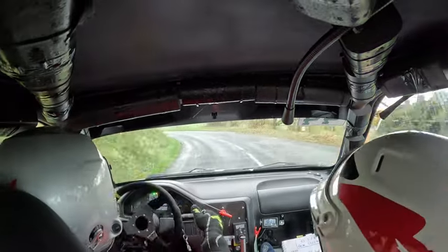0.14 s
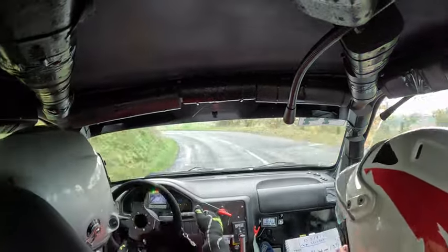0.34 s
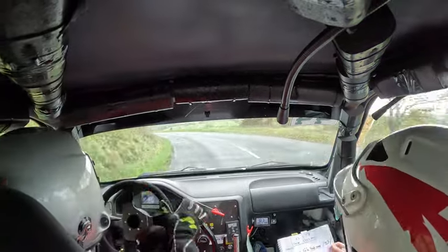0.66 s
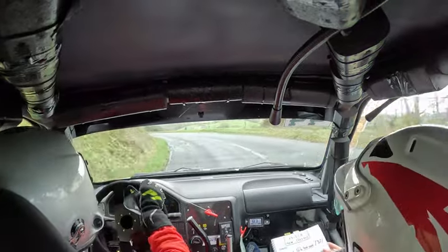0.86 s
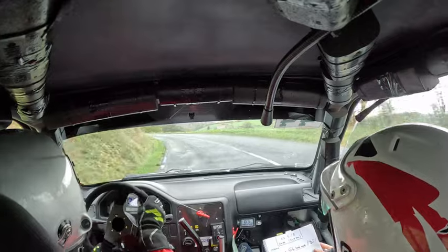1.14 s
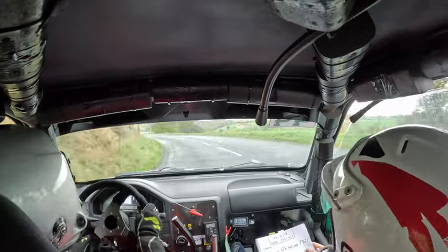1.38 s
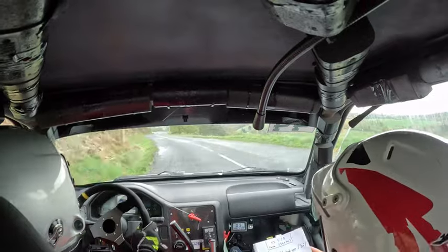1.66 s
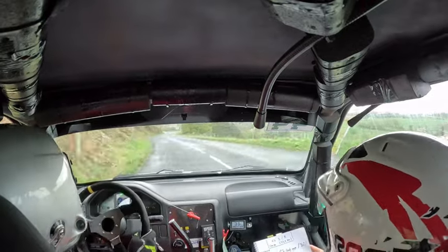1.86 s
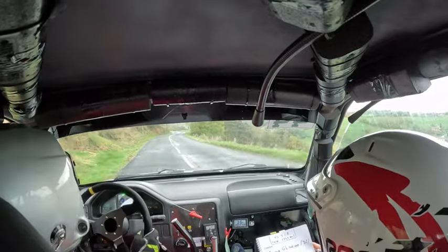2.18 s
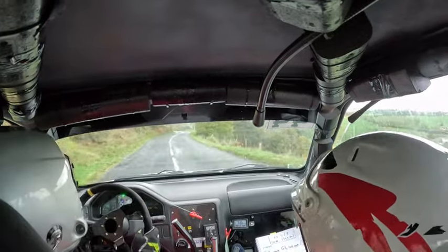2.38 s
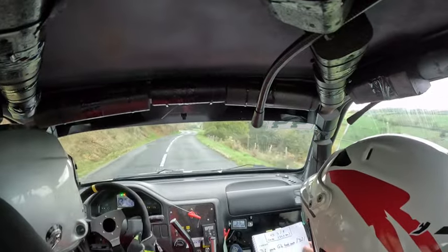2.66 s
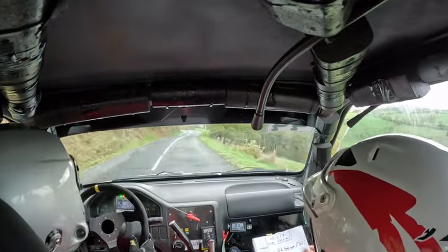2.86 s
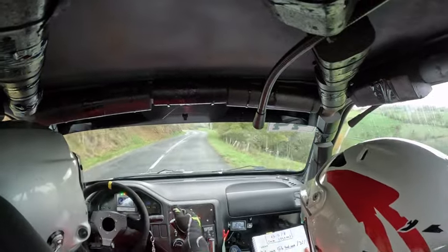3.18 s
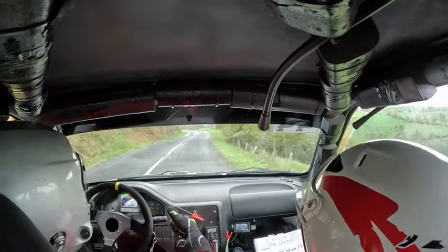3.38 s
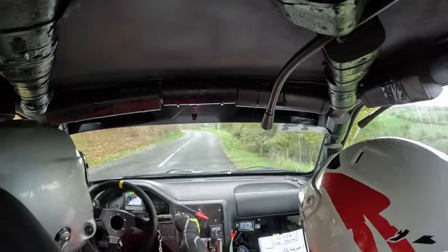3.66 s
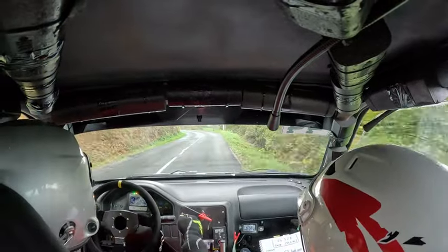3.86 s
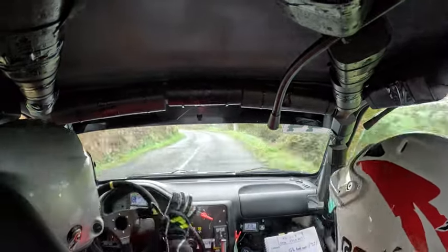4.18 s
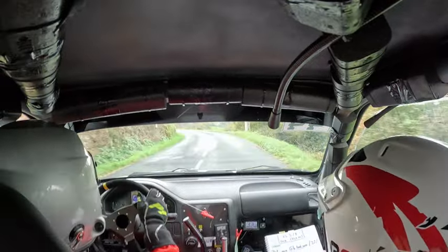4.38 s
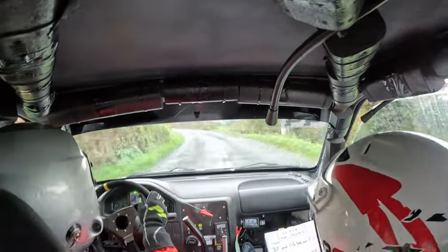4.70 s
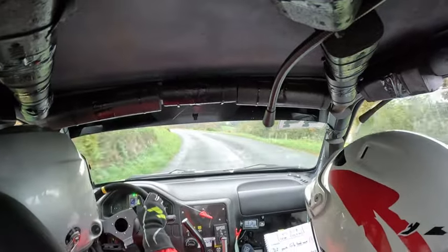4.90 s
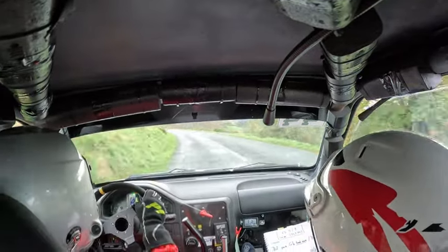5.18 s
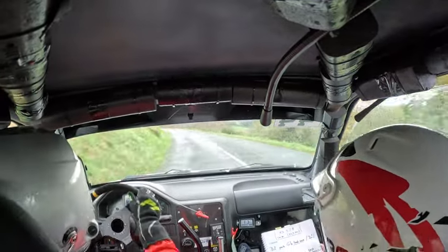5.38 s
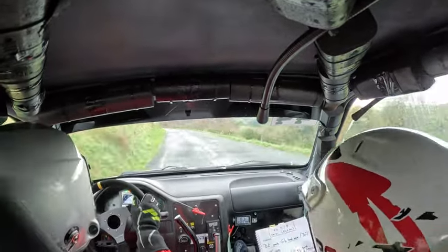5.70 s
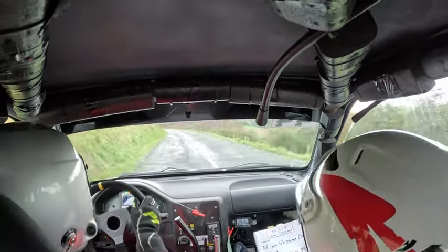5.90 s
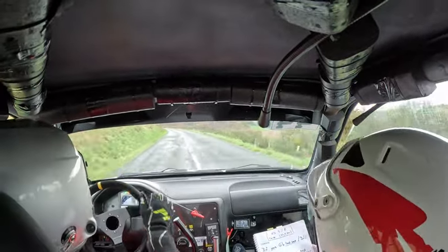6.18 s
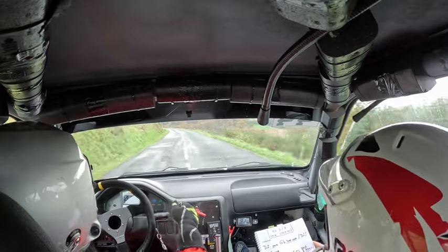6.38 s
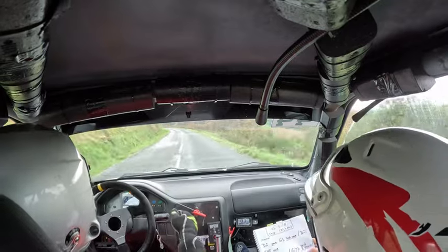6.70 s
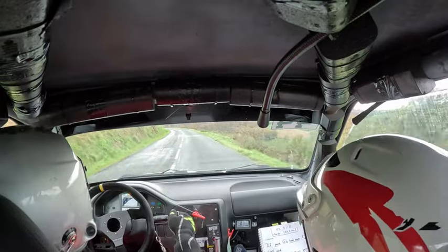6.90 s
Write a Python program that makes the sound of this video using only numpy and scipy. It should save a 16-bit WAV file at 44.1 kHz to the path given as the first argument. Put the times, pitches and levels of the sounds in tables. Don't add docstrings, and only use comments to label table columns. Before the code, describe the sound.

Heard from between the seats of a stripped rally car, a small four-cylinder engine pulls at full throttle. Its loud, buzzing drone rises briefly, dips ragged in a fast gear change, climbs for about three seconds, dips again and climbs to the end. Rough tarmac shakes the metal shell, thuds come through the floor, and grit ticks underneath. Valve clatter and wind hiss stay on top; peaks are squashed level.

```python
import sys
import numpy as np
from scipy import signal
from scipy.fft import rfft, irfft, next_fast_len
from scipy.io import wavfile
from scipy.ndimage import uniform_filter1d

SR = 44100
rng = np.random.default_rng(int(sys.argv[2]) if len(sys.argv) > 2 else 0)


def magnitude_from_level(level_db):
    exponent = np.asarray(level_db, float) / 20
    return 10 ** exponent


def output_pcm(signal):
    pcm = np.clip(np.atleast_2d(signal).T, -1, 1) * 32767
    wavfile.write(sys.argv[1], SR, np.round(pcm).astype(np.int16))


N = 310905
STEP = 40


def rms_one(x):
    return x / np.sqrt(np.mean(x ** 2) + 1e-20)


def smooth(coarse):
    return np.interp(np.arange(N) / STEP, np.arange(len(coarse)), coarse)


def chance(rate):
    r = np.exp(-2 * np.pi * rate * STEP / SR)
    noise = rng.standard_normal(N // STEP + 501)
    return rms_one(signal.lfilter([1], [1, -2 * r, r * r], noise)[500:])


def drift(rate):
    return smooth(chance(rate))


def in_time(rows):
    s, *columns = np.transpose(rows)
    return [np.interp(np.arange(N) / SR, s, column) for column in columns]


def tents(s, db, half):
    t = np.arange(0, N + STEP, STEP) / SR
    closeness = np.clip(1 - np.abs(t - s[:, None]) / np.abs(half)[:, None], 0, 1)
    return smooth(np.sum(db[:, None] * closeness, axis=0))


def colour(x, spectrum):
    hz, db = np.transpose(spectrum)
    size = next_fast_len(N)
    bins = np.fft.rfftfreq(size, 1 / SR)[1:]
    gain = magnitude_from_level(np.interp(np.log(bins), np.log(hz), db, left=-90, right=-90))
    return irfft(rfft(x, size) * np.r_[0, gain], size)[:N]


def resonate(x, hz, width):
    r = np.exp(-np.pi * width / SR)
    peak = (1 - r * r) / 2
    return signal.lfilter([peak, 0, -peak], [1, -2 * r * np.cos(2 * np.pi * hz / SR), r * r], x)


def even(x, floor):
    x = rms_one(x)
    return rms_one(x / np.sqrt(uniform_filter1d(x ** 2, size=2400) + floor))


# time in seconds, firing rate in Hz.
FIRST_PULL = [
    (0, 234.8),
    (.3, 243.8),
    (.5, 252.4),
    (.61, 255.6),
    (.66, 252),
]
FIRST_CHANGE = [
    (.7, 230),
    (.73, 225.5),
    (.77, 223),
    (.8, 207),
]
SECOND_PULL = [
    (.9, 213),
    (1.04, 212),
    (1.28, 215.6),
    (1.52, 224.6),
    (1.76, 221.7),
    (2.42, 226),
    (3.0, 239.6),
    (3.5, 251.3),
    (3.88, 260),
]
SECOND_CHANGE = [
    (4.0, 256),
    (4.085, 250),
    (4.15, 222),
]
THIRD_PULL = [
    (4.38, 220.6),
    (4.76, 226.8),
    (5.3, 234),
    (5.42, 236.6),
    (5.54, 240.4),
    (5.75, 240.4),
    (6.4, 249),
    (6.84, 254.3),
    (7.05, 258.5),
]


def engine_speed():
    return in_time(FIRST_PULL + FIRST_CHANGE + SECOND_PULL + SECOND_CHANGE + THIRD_PULL)[0]


# time in seconds, fine roughness in dB, long waves in dB, wind in dB.
ROAD = [(0, -1, -0.5, -1), (.3, -2, -3, -1), (.6, 2, -2, -1), (.8, 3, 1.5, 2.5), (1.25, 1, 6.5, 2),
        (1.7, 5, 5, 0), (2.2, -1, -7, -1), (2.67, -8.5, -8.5, -1.5), (3.3, 0.5, -5.5, -2.5),
        (3.7, 0.5, 0, 0.5), (4.2, 7, 7, 1.5), (4.4, -4.5, -2.5, -1.5), (5.1, -7, -3.5, -2),
        (5.6, 1.5, 2.5, 1), (6.0, 2.5, 3, .5), (6.4, 4.5, 4, -0.5), (6.7, 0.5, 4, 1), (7.05, 5, 1.5, 1.5)]
# centre in seconds, thud in dB, rattle in dB, half length in seconds.
JOLTS = [(0.315, -8, -3.5, 0.065), (0.58, -12, 2, 0.036), (0.692, 7, 3.5, .03), (0.924, 0.5, 3, 0.044),
         (1.176, 3, 1.5, .06), (1.307, -12, 6, 0.031), (1.347, 7, 2.5, 0.051), (2.288, -2, 2, 0.063),
         (2.385, -15, -1, 0.09), (2.916, -1, 4.5, 0.062), (3.047, -2, 5.5, 0.057), (3.646, -6.5, 1.5, .05),
         (3.782, 1, 2.5, 0.073), (3.867, 3, 4.5, 0.024), (4.047, 7, 0, 0.04), (4.187, 1, 4.5, 0.046),
         (4.36, -7, 1.5, 0.062), (5.633, -3, 4, 0.04), (5.873, -7, 0.5, 0.067), (6.314, 4.5, 0.5, 0.078),
         (6.73, -1, 1, 0.045), (6.79, -7, 5, .04), (6.973, 1.5, 8, 0.075)]
SHAKE_DB, RUMBLE_DB, HISS_DB, LESSER_DB = -22.5, -30.5, -30.5, -28.5
HISS_RATTLES, LESSER_RATTLES = 0.57, 0.66
LESSER_FOLLOWS = 0.37
HISS_DB_PER_HZ, LESSER_DB_PER_HZ, MIDDLE_HZ = 0.0758, -0.0035, 243


def road_levels(firing_hz):
    rough, waves, wind = in_time(ROAD)
    s, thud_db, rattle_db, half = np.transpose(JOLTS)
    rattle = tents(s, rattle_db, half)
    faster = firing_hz - MIDDLE_HZ
    hiss_db = HISS_DB + wind + HISS_RATTLES * rattle + HISS_DB_PER_HZ * faster
    rumble_db = RUMBLE_DB + waves + tents(s, thud_db, half) + 1.5 * drift(3)
    shake_db = SHAKE_DB + rough + rattle + 0.77 * drift(1.3)
    lesser_db = LESSER_DB + LESSER_FOLLOWS * wind + LESSER_RATTLES * rattle
    lesser_db = lesser_db + LESSER_DB_PER_HZ * faster + 0.58 * drift(6)
    return hiss_db, rumble_db, shake_db, lesser_db


# start in seconds, end in seconds, raggedness from 0 to 1.
RAGGED = [
    (.655, .81, 1),
    (.81, 1.6, .4),
    (3.9, 4.15, 1),
    (5.475, 5.69, .3),
]


def raggedness():
    t = np.arange(N) / SR
    spells = sum(share * ((t >= start) & (t < end)) for start, end, share in RAGGED)
    return uniform_filter1d(spells, size=1700)


# firing rate in Hz, then crank tone, firing, twice firing and three times firing in dB.
BOOM = [(206, -42, -28, -21.5, -26), (208.9, -41, -23.5, -17.5, -20), (221.1, -46, -9.5, -16, -22.5),
        (223.7, -44, -7.5, -16, -25), (230.8, -37, -9, -17, -34), (231.3, -42, -8.5, -17, -31),
        (238.6, -38.5, -10, -17, -20), (240.9, -31.5, -14, -18, -20), (251.2, -22.5, -13.5, -18.5, -17.5),
        (259.8, -17.5, -13, -21, -22.5)]
# engaged from in seconds, then crank, firing, twice firing and three times firing in dB.
GEARS = [
    (0, -6, -2, 1, -5),
    (.78, -1.5, -1, 0, 0.5),
    (4.151, 5.5, -1, -4, 1.5),
]
# centre in seconds, change in dB, half length in seconds.
SHUDDER = [(0.748, 1.5, 0.038), (0.842, -30, 0.01), (0.997, -10, 0.062), (1.203, -12, .07),
           (1.32, -31, 0.044), (1.785, -6.5, 0.13), (2.8, 4, 0.055), (3.07, -9.5, .04), (3.202, -8.5, .04),
           (3.533, -16, .05), (3.652, -16, 0.065), (3.79, -9, 0.14), (3.976, -6, 0.036), (4.011, 7, 0.021),
           (4.111, -5, 0.045), (5.216, -4.5, 0.066), (5.452, -7, 0.13), (5.629, -10, .04),
           (5.786, -4, 0.026), (5.963, -13, 0.11), (6.146, -19.5, .16), (6.336, -15, 0.062),
           (6.454, -28, .04), (6.648, -9, 0.097), (6.792, -4, 0.037), (6.854, -13.5, 0.027),
           (6.917, 8.5, 0.032)]
LOAD_FADES_HZ = (240, 241.5)
ROCK_DB, ROCK_FADE_DB_PER_S = -26, 10.5


def order_levels(firing_hz):
    hz, *booms = np.transpose(BOOM)
    s, *loads = np.transpose(GEARS)
    t = np.arange(N) / SR
    gear = np.clip(np.searchsorted(s, t) - 1, 0, None)
    low = np.interp(firing_hz, LOAD_FADES_HZ, [1, 0])
    crank, firing, second, third = [np.interp(firing_hz, hz, boom) + load[gear] * low
                                    for boom, load in zip(booms, loads)]
    rock = np.where(gear > 0, ROCK_DB - ROCK_FADE_DB_PER_S * (t - s[gear]), -90)
    shudder = tents(*np.transpose(SHUDDER))
    crank = np.maximum(crank, rock) + 1.9 * drift(3.5)
    second = second + 0.3 * shudder + 1.1 * drift(6)
    third = third - .05 * shudder + 1.3 * drift(5)
    return crank, firing + shudder, second, third


def tone(turns, level_db, ragged, wobble_db, waver):
    height = np.sqrt(2) * magnitude_from_level(level_db[::STEP] + wobble_db * chance(19))
    phase = waver * chance(4.5) + ragged[::STEP] * chance(30)
    return smooth(height) * np.cos(2 * np.pi * turns + smooth(phase))


# firing rate in Hz, lead in turns.
LEAD = [(220, .07), (228, .24), (233, .27), (237, .08), (246, .05), (252, .25)]
# multiple of the four-stroke cycle, level in dB.
ORDERS_DB = [(1, -24), (3, -14.5), (5, -8.5), (6, -10.5), (7, -24.5), (9, -17.5), (10, -27), (11, -25),
             (13, -19), (14, -22), (15, -29.5), (16, -16.5), (17, -34.5), (18, -24.5), (19, -29), (20, -22),
             (21, -35.5), (22, -31.5), (23, -40.5), (24, -25.5)]
# centre in Hz, width in Hz, lift in dB.
SHELL = [(178, 18, 9.5), (343.4, 68, 11.5), (601.4, 78, 15.5), (768.5, 95, 12.5), (904.6, 76, 9),
         (971, 21, 6), (1081, 38, 10.5), (1221, 70, 11), (1486, 70, 12), (1690, 150, 10.5), (1990, 150, 6),
         (2820, 220, 9)]
HIGH_DB, HIGH_FALL_DB, FIRING_LIFT_DB, CRANK_LIFT_DB = -36.5, 0.2, 5, 2.5
LIFT_LOSS_DB = 3


def engine(firing_hz, cycles, lesser_db):
    crank_db, firing_db, second_db, third_db = order_levels(firing_hz)
    lift = raggedness()
    second_db = second_db - LIFT_LOSS_DB * lift ** 2
    third_db = third_db - 2 * LIFT_LOSS_DB * lift ** 2
    out = tone(2 * cycles, crank_db - 1.0, .1 * lift, wobble_db=1.0, waver=0.096)
    out += tone(4 * cycles, firing_db - .6, .1 * lift, wobble_db=.8, waver=.12)
    second_lead = np.interp(firing_hz, *np.transpose(LEAD))
    third_lead = np.interp(firing_hz, [228, 234], [.4, 0])
    out += tone(8 * cycles + second_lead, second_db - .8, 1.3 * lift, wobble_db=1.1, waver=.15)
    out += tone(12 * cycles + third_lead, third_db - 1.5, 1.8 * lift, wobble_db=1.2, waver=.2)

    grid = np.arange(3200.)
    shell_db = sum(db / (1 + (2 * (grid - hz) / width) ** 2) for hz, width, db in SHELL)
    high = np.arange(25, 47)
    high_db = HIGH_DB - HIGH_FALL_DB * (high - high[0])
    high_db = high_db + FIRING_LIFT_DB * (high % 4 == 0) + CRANK_LIFT_DB * (high % 4 == 2)
    for k, db in [*ORDERS_DB, *zip(high, high_db)]:
        level_db = lesser_db + db + 3 + np.interp(k * firing_hz / 4, grid, shell_db)
        out += tone(k * cycles + rng.random(), level_db, 1.8 * lift, wobble_db=2.2, waver=.3)
    return out


def cabin(x):
    t = np.arange(40, 5000) / SR
    tail = rng.standard_normal(len(t)) * magnitude_from_level(-60 * t / .12)
    return signal.fftconvolve(x, np.r_[1, .33 * tail / np.linalg.norm(tail)])[:N]


# frequency in Hz, density in dB per Hz.
HISS = [(600, -34.5), (900, -5), (1050, -15), (1240, -16), (1500, -17), (1950, -16.5), (2600, -20.5),
        (3500, -24), (4300, -31), (5500, -36.5), (7500, -48.5), (10400, -60.5), (12300, -54),
        (15800, -61.5)]


def hiss(firing_hz, cycles, hiss_db):
    turn = 2 * np.pi * cycles
    puffs = 1 + 0.086 * np.cos(4 * turn) + 0.057 * np.cos(2 * turn) + 0.026 * np.cos(turn)
    flutter = magnitude_from_level(.6 * drift(7) + .5 * drift(45))
    noise = rms_one(colour(cabin(rng.standard_normal(N)) * puffs * flutter, HISS))
    low = signal.sosfiltfilt(signal.butter(2, 6500, fs=SR, output="sos"), noise)
    top_gain = magnitude_from_level(0.09 * (firing_hz - 237.5) + 0.81 * drift(6))
    return magnitude_from_level(hiss_db) * (low + top_gain * (noise - low))


# resonance in Hz, width in Hz, level in dB.
PANELS = [(149, 11, -8), (183, 230, -8), (217.3, 52.5, 5.5), (304, 510, -19.5), (440, 38, -8),
          (632, 25, -4), (797, 91, -8), (810, 170, -6)]


def panels(shake_db):
    rings = 0
    for hz, width, db in PANELS:
        ring = even(resonate(rng.standard_normal(N), hz, width), floor=.6)
        rings = rings + magnitude_from_level(db + 1.5 * drift(8)) * ring
    dull = signal.sosfilt(signal.butter(2, [90, 1100], "band", fs=SR, output="sos"), rings)
    return magnitude_from_level(shake_db) * rms_one(dull)


# frequency in Hz, density in dB per Hz.
RUMBLE = [(18, -10.5), (33, 3.5), (45, -2.5), (65, -6), (90, -14.5)]


def rumble(rumble_db):
    return magnitude_from_level(rumble_db) * even(colour(rng.standard_normal(N), RUMBLE), floor=.15)


# start in seconds, treble in dB, rise in seconds, darkness in dB.
GRIT = [(.508, -61, .009, 0), (.535, -65, .006, 0), (.615, -70, .005, 2), (.675, -69, .006, 2),
        (.786, -69, .004, 2), (.813, -61, .007, 0), (.865, -70, .004, 0), (.922, -64, .008, 6),
        (.975, -71, .004, 0), (.996, -65, .006, -3), (1.036, -65, .008, -2), (1.132, -64, .006, 2),
        (1.158, -56, .011, -1), (1.208, -62, .003, 3), (1.293, -74, .006, 8), (1.355, -69, .005, 0),
        (1.436, -65, .005, -2), (1.552, -64, .007, 3), (1.806, -64, .008, 1), (2.39, -72, .006, 3),
        (3.6, -69, .006, 3), (3.72, -68, .01, -2), (3.85, -67, .01, -2), (4.05, -60, .011, -5),
        (4.097, -66, .006, -4), (4.259, -59, .006, -7), (5.597, -67, .006, 0), (5.638, -61, .007, -2),
        (5.785, -71, .005, 3), (6.96, -64, .008, -4)]
# frequency in Hz, density in dB per Hz.
GRIT_COLOUR = [(1200, 2), (4000, 6), (7000, 5), (10500, -10), (12500, 0), (14500, -2), (15800, -10)]


def grit():
    t, spray, dull = np.arange(0, N, STEP) / SR, 0, 0
    for s, db, rise, dark_db in GRIT:
        after = np.clip(t - s, 0, None) / rise
        swell = after * np.exp(1 - after)
        spray = spray + magnitude_from_level(db + 1.5) * swell
        dull = dull + magnitude_from_level(db + dark_db + 4.0) * swell
    sizes = magnitude_from_level(3.5 * np.minimum(rng.exponential(1, N), 4)) * rng.choice([-1, 1], N)
    struck = rng.random(N) < 9000 / SR
    ticks = colour(sizes * struck, GRIT_COLOUR)
    low = signal.sosfiltfilt(signal.butter(4, 10500, fs=SR, output="sos"), ticks)
    high = ticks - low
    return (smooth(dull) * low + smooth(spray) * high) / np.std(high)


def scene():
    firing_hz = engine_speed()
    cycles = np.cumsum(firing_hz / 4) / SR
    hiss_db, rumble_db, shake_db, lesser_db = road_levels(firing_hz)
    motor = engine(firing_hz, cycles, lesser_db) + hiss(firing_hz, cycles, hiss_db)
    return (motor + panels(shake_db) + rumble(rumble_db) + grit())[None]


def limiter(x):
    over_db = np.maximum(20 * np.log10(np.abs(x) + 1e-9) + 2.8, 0)
    ramp = 32.0 * np.arange(N) / SR
    held_db = np.maximum.accumulate(over_db + ramp, axis=1) - ramp
    early = np.pad(held_db[:, 120:], ((0, 0), (0, 120)), mode="edge")
    eased_db = uniform_filter1d(uniform_filter1d(early, size=120, axis=1), size=120, axis=1)
    return x * magnitude_from_level(-eased_db)


HOLE_EDGES_HZ = [7200, 7700, 8300, 9000, 9700, 10500]


def holes(x):
    hz, s, frames = signal.stft(x, SR, nperseg=1024)
    busy = drift(1.2)
    for k, (low, high) in enumerate(zip(HOLE_EDGES_HZ, HOLE_EDGES_HZ[1:])):
        starved = np.interp(s, np.arange(N) / SR, drift(9) + .6 * busy) > 2.3 - .4 * k
        frames[:, (hz >= low) & (hz < high)] *= ~starved
    return signal.istft(frames, SR, nperseg=1024)[1][:, :N]


def low_pass(x):
    return signal.sosfilt(signal.butter(12, 15741, fs=SR, output="sos"), x)


def record(dry):
    mix = holes(limiter(dry))
    return low_pass(mix)


dry = scene()
out = record(dry)
output_pcm(out)
```